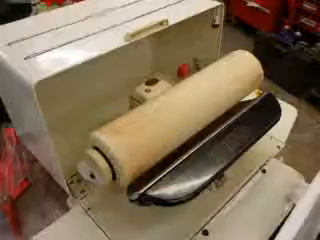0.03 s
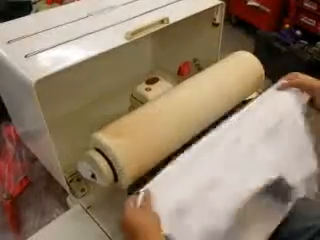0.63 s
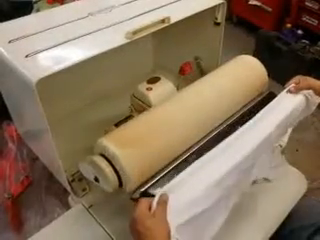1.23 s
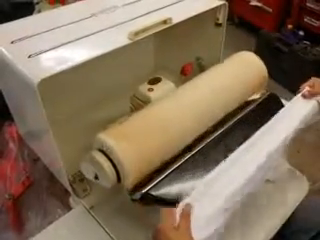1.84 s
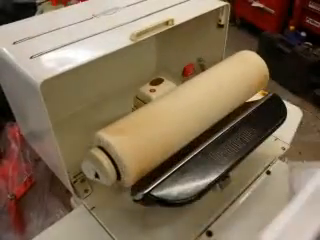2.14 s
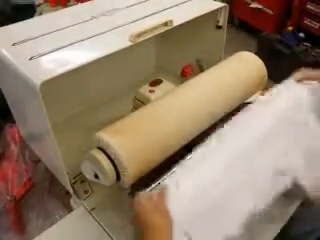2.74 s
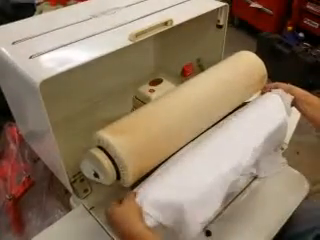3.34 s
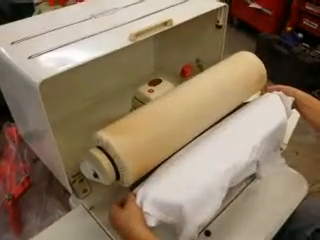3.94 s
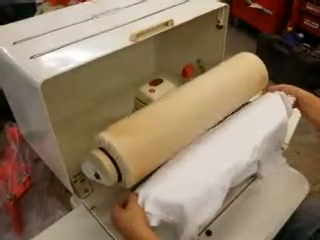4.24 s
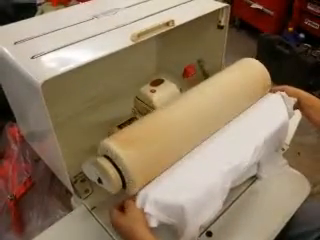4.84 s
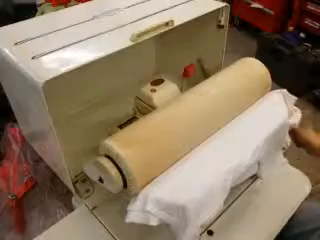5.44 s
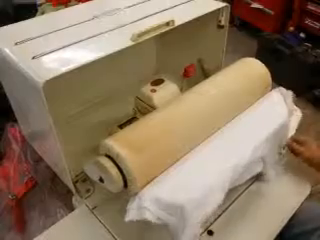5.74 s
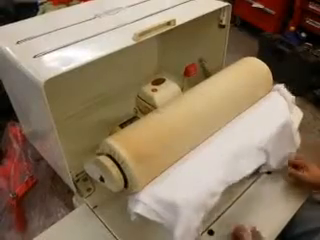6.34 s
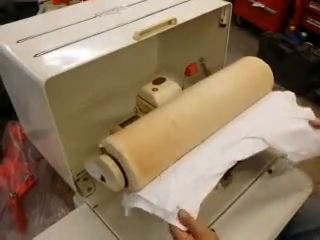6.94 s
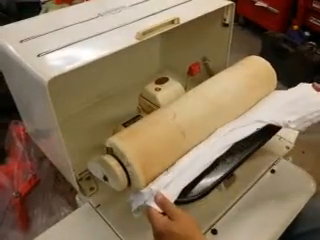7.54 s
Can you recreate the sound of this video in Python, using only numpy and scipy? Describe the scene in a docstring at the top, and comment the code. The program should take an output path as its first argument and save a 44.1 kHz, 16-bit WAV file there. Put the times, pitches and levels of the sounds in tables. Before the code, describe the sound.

In a workshop, a rotary ironer runs with a low hum, a wavering whine and rough gear noise, heard in stereo a little to the right. Its clutch clicks and steel levers clack in two main bursts, with dull cabinet thuds and faint cloth rustles between. Then the pressing plate comes down with a juddering slam and a brief hiss. The machine keeps humming, and each blow leaves a short ring.

```python
"""A workshop, with a vintage rotary ironer running nearer the right microphone of a stereo pair.
Its induction motor hums and whines, the gearbox churns and a bearing buzzes while a cloth is fed in.
Over that bed the clutch pawl clicks and the linkage clacks against the sheet-steel cabinet as the
heated shoe closes on the roller and lets go. Late on the shoe slams down and the roller hisses
against the cloth. Each blow leaves a short tail in cabinet and room."""
import sys
import numpy as np
from scipy import signal
from scipy.fft import rfft, irfft
from scipy.io import wavfile

SR = 44100
rng = np.random.default_rng(int(sys.argv[2]) if len(sys.argv) > 2 else 0)


def unload_audio(sound):
    """Save the sound as a 16-bit wav file, at the path given as the first command line argument."""
    columns = np.transpose(np.atleast_2d(sound))
    # keep every value between -1 and 1, then stretch to whole-number steps
    steps = np.round(np.clip(columns, -1, 1) * 32767)
    wavfile.write(sys.argv[1], SR, steps.astype(np.int16))


N = 335160
TIME = np.arange(N) / SR
BINS = np.maximum(np.arange(N // 2 + 1) * SR / N, 1)
MAINS_HZ, ROTOR_SLOTS, CUTOFF_HZ = 60, 33, 15900
START_S, FULL_S = .387, .62  # the sound of the already running machine fades in to full level
SLAM_S, ROLLING_S = 5.5435, 5.55  # the shoe slams down; the roller grabs the cloth

# likeness of the two microphones: (frequency [Hz], correlation [clipped to -1..1])
MIC_LIKENESS = [(30, 3), (100, 0.66), (300, 1.3), (700, 0.7), (1400, 0.24), (2500, -0.22), (16000, 0.17)]
# bright colour of steel cracks and cloth swishes: (frequency [Hz], density [dB])
BRIGHT_COLOUR = [(2500, -2), (4500, -12), (6000, 1.5), (6900, 2), (8500, -1.5), (10000, -7), (11300, -13.5),
                 (13500, -11), (16000, -30)]


def from_db(db):
    """Decibels to gain."""
    return 10 ** (np.asarray(db) / 20)


def in_time(points):
    """A (time, value) curve read at every sample."""
    return np.interp(TIME, *np.transpose(points))


def at_hz(points, hz):
    """A (frequency, value) curve read on a log-frequency axis."""
    f, value = np.transpose(points)
    return np.interp(np.log(hz), np.log(f), value)


def drift(rate_hz):
    """Slow random wander with spread 1."""
    pole = np.exp(-80 * np.pi * rate_hz / SR)
    noise = rng.standard_normal(N // 40 + 2002)  # one value per 40 samples
    slow = signal.lfilter([1], [1, -2 * pole, pole * pole], noise)[2000:]
    return np.interp(np.arange(N) / 40, np.arange(len(slow)), slow / slow.std())


def turns(hz):
    """Phase in radians of something that runs at a changing rate."""
    return 2 * np.pi * np.cumsum(hz) / SR


def add(out, s, sound):
    """Mix a sound in from a given time on."""
    i = round(s * SR)
    out[..., i:i + sound.shape[-1]] += sound[..., :N - i]


def filtered(x, kind, hz):
    """Second-order low-pass or high-pass."""
    return signal.sosfilt(signal.butter(2, hz, kind, fs=SR, output="sos"), x + 1e-18)


def mic_gains(hz):
    """Left and right gain at a frequency: the machine is nearer the right microphone."""
    # balance of the pair: (frequency [Hz], left minus right [dB])
    balance = [(120, -2), (300, -3.5), (1000, -3.5), (1500, -6), (1850, -5.5), (2250, -18), (2700, -5.5),
               (3300, -4.5), (4500, -5), (5800, -11), (6700, -6), (8000, -6), (9300, -15.5), (10800, -2),
               (12500, -3.5), (15000, -2)]
    gains = from_db(at_hz(balance, np.atleast_1d(hz)) * np.array([[.5], [-.5]]))
    return gains / gains.mean(axis=0)


def coloured(spectrum):
    """Stereo noise of a given colour with steep skirts; its middle has rms 1."""
    alike = np.clip(at_hz(MIC_LIKENESS, BINS), -1, 1)
    mid, side = rfft(rng.standard_normal((2, N)))
    skirts = np.minimum(1, np.minimum(BINS / spectrum[0][0], spectrum[-1][0] / BINS)) ** 4
    pair = np.sqrt(1 + alike) * mid + np.sqrt(1 - alike) * side * [[1], [-1]]
    noise = irfft(pair * mic_gains(BINS) * skirts * from_db(at_hz(spectrum, BINS)), N)
    return noise / noise.mean(axis=0).std()


def revolving(spectrum, shaft, repeat_share):
    """Rubbing parts: a share of the noise comes back alike on every turn of the shaft."""
    fresh = coloured(spectrum)
    period = round(2 * np.pi * N / shaft[-1])
    hz = np.maximum(np.arange(period // 2 + 1) * SR / period, 1)
    inside = (hz > spectrum[0][0]) & (hz < spectrum[-1][0])
    spread = np.arccos(np.clip(at_hz(MIC_LIKENESS, hz), -1, 1)) * rng.choice([-.5, .5], len(hz))
    phases = rng.uniform(0, 2 * np.pi, len(hz)) + spread * [[1], [-1]]
    turn = irfft(inside * from_db(at_hz(spectrum, hz)) * mic_gains(hz) * np.exp(1j * phases), period)
    turn /= turn.mean(axis=0).std()
    place = shaft / (2 * np.pi) % 1 * period
    repeating = np.array([np.interp(place, np.arange(period), channel) for channel in turn])
    return np.sqrt(repeat_share) * repeating + np.sqrt(1 - repeat_share) * fresh


def ringing(modes):
    """One second of decaying modes, each reaching the two microphones slightly apart."""
    t, out = TIME[:SR], np.zeros((2, SR))
    for hz, db, t60 in modes:
        tone = np.sin(2 * np.pi * hz * (t + rng.uniform(0, .0002, (2, 1)))) * rng.choice([-1, 1])
        out += mic_gains(hz) * from_db(db - 60 * t / t60) * tone
    return out


def mic_hiss(level_db=-62.5):
    """The microphones' own steady hiss."""
    # noise floor: (frequency [Hz], density [dB])
    colour = [(2000, 1.5), (9000, 2.5), (10500, -4), (12500, -1.5), (15000, -1), (15800, -14)]
    return from_db(level_db) * coloured(colour)


def hum():
    """The motor's iron is pulled twice in every mains cycle."""
    # magnetic hum, dipping briefly at the slam: (time [s], level [dB])
    level = [(.42, -46.5), (.63, -37.5), (4.1, -34.5), (4.35, -36), (5.53, -40.5), (5.59, -51),
             (5.66, -38.5), (6.16, -41), (6.9, -37), (7.6, -36)]
    # its harmonics: (frequency [multiples of the mains], relative level [dB])
    harmonics = [(2, 3), (4, -22.5), (6, -47)]
    field = 2 * np.pi * MAINS_HZ * TIME
    tone = sum(from_db(db) * mic_gains(k * MAINS_HZ) * np.cos(k * field) for k, db in harmonics)
    return from_db(in_time(level)) * tone


def rotor(shaft, shaft_hz, waver_db=2.5, windage_db=-51.5, throb=0.5):
    """Rotor slots whine, with sidebands and a throbbing rush from the pulsing field."""
    # loudness of the whine: (time [s], level [dB])
    level = [(.6, -44), (1.4, -42.5), (1.8, -51), (2.2, -46.5), (3.6, -47), (4.5, -44.5), (5.8, -43),
             (6.25, -44.5), (6.8, -42.5)]
    # its partials: (order [shaft multiples], sideband [mains multiples], relative level [dB])
    partials = [(33, -2, -3.5), (33, 0, -4.5), (33, 2, -8), (34, 0, -10), (34, 2, -13), (26, 0, -14),
                (18, 0, -13), (11, 0, -7.5), (8, 0, -10.5), (44, 0, -15), (50, 0, -32)]
    # high overtones, heard until the roller is driven: same columns, orders rounded for the pitch
    idle_partials = [(65.54, 2, -10), (100.4, 0, -18.5), (132.5, 0, -25.5), (168, 0, -30)]
    # air rushing round the rotor: (frequency [Hz], density [dB])
    air_colour = [(500, -6), (740, -5), (860, 0.5), (1000, 2), (1130, -2), (1220, -7), (1400, -9),
                  (1800, -24), (3000, -38)]
    field, whine_db = 2 * np.pi * MAINS_HZ * TIME, in_time(level)
    idling = np.clip((ROLLING_S - TIME) * 10, 0, 1)
    whine = np.zeros((2, N))
    for rows, share in (partials, 1), (idle_partials, idling):
        for order, sideband, db in rows:
            phase = round(order) * shaft + sideband * field + rng.uniform(0, 2 * np.pi)
            apart = rng.normal(0, 0.37) * np.array([[1], [-1]])  # reflections shift each side's phase
            gain = share * from_db(db + waver_db * drift(1.83))
            whine += gain * mic_gains(order * shaft_hz) * np.cos(phase + apart)
    air_gain = from_db(windage_db + 0.46 * (whine_db - whine_db.mean()))
    windage = air_gain * coloured(air_colour) * (1 + throb * np.cos(2 * field))
    return from_db(whine_db) * whine + windage


def gearbox(shaft, idle_db=-47.5, lumpy_db=1.9):
    """Gears churn evenly when idle and roughly under load."""
    # low churning: (frequency [Hz], density [dB])
    colour = [(35, -23.5), (75, -7.5), (105, -5), (150, 6), (172, 6), (200, -4), (250, -2), (330, -1),
              (440, -1.5), (510, -9), (600, -15), (750, -14), (1200, -18.5), (2000, -15)]
    # load, heard as the strength of the churning: (time [s], level [dB])
    load = [(0.62, -43), (0.73, -47), (1.31, -41), (1.43, -40.5), (2.09, -39.5), (2.41, -52), (2.84, -45),
            (3.23, -50.5), (4.19, -40.5), (4.35, -45.5), (4.75, -42), (5.41, -46.5), (5.62, -37.5),
            (5.79, -42), (6.08, -52.5), (7.16, -47.5), (7.55, -53)]
    load_db = in_time(load) + 1
    evenness = 0.59 * from_db(-np.maximum(load_db - idle_db, 0))
    return from_db(load_db + lumpy_db * drift(8.9)) * revolving(colour, shaft, evenness)


def bearing(shaft):
    """The bearing's buzz pulses once a turn and twice a mains cycle."""
    # rubbing in the bearing: (frequency [Hz], density [dB])
    colour = [(1200, -10), (1500, -8.5), (1880, -4), (2020, 2.5), (2180, 6), (2380, -2.5), (2550, -32),
              (2800, -11), (3300, -26), (4500, -47)]
    # its buzz: (time [s], level [dB])
    level = [(0.62, -55.5), (1.53, -51.5), (2.69, -52), (3.07, -50), (3.36, -55), (3.71, -54.5),
             (4.02, -48.5), (4.27, -60), (4.54, -54.5), (5.58, -45), (5.73, -50), (7.55, -49.5)]
    beat = 1 + 0.093 * np.cos(shaft) + 0.17 * np.cos(4 * np.pi * MAINS_HZ * TIME)
    return from_db(in_time(level)) * beat * revolving(colour, shaft, repeat_share=0.24)


def roller(still_db=-59.0, rolling_db=-50.5, grab_db=16.0, grab_s=0.079):
    """A faint hiss flares as the roller grabs the cloth, then settles louder than before."""
    # roller hiss: (frequency [Hz], density [dB])
    colour = [(2500, 3), (3000, -4), (3400, -4), (4600, -6), (5900, 0), (7000, -1.5), (9000, -12.5),
              (10400, -19.5), (15000, -32)]
    flare_db = grab_db * np.exp(-abs(TIME - ROLLING_S) / grab_s)
    level_db = np.where(TIME < ROLLING_S, still_db, rolling_db + flare_db)
    return from_db(level_db + 0.93 * drift(4.1)) * coloured(colour)


def groans(waver_db=5.0):
    """Under load, gears groan in short glides and the motor adds a wavering whine."""
    # gear and motor tones: (start [s], end [s], first pitch [Hz], last pitch [Hz], level [dB])
    tones = [(1.6, 2.2, 680, 650, -54), (1.7, 2.12, 440, 455, -49), (1.55, 2.45, 168, 162, -45),
             (1.4, 2.3, 921, 921, -52), (4.68, 5.2, 505, 530, -53)]
    out = np.zeros((2, N))
    for start, end, first_hz, last_hz, db in tones:
        along = np.clip((TIME - start) / (end - start), 0, 1)
        hz = (first_hz + (last_hz - first_hz) * along) * (1 + 0.011 * drift(27.5))
        envelope = from_db(db + waver_db * drift(13.0)) * np.sqrt(abs(np.sin(np.pi * along)))
        out += mic_gains(first_hz) * envelope * np.sin(turns(hz))
    return out


def cloth(grain_db=2.8):
    """Cloth slides over the table in soft, grainy swishes."""
    # swishes: (time [s], half length [s], level [dB])
    rustles = [(0.877, 0.02, -53), (0.942, 0.038, -51.5), (3.233, 0.047, -53), (3.548, 0.033, -55.5),
               (4.585, 0.075, -51.5), (5.447, .04, -47.5)]
    swell = sum(from_db(db) * np.exp(-((TIME - s) / half) ** 2) for s, half, db in rustles)
    return swell * from_db(grain_db * drift(60)) * coloured(BRIGHT_COLOUR)


def pop(s=2.6053, gain_db=-8.0, fall_s=0.0026, right_db=-24.0):
    """One dry pop at the left microphone: a pressure step that swings back slowly."""
    out, t = np.zeros((2, N)), TIME[:SR // 10]
    pulse = filtered(np.exp(-t / fall_s) - np.exp(-t / .00008), "high", 65)
    add(out, s, from_db([[gain_db], [gain_db + right_db]]) * pulse)
    return out


def handling():
    """The shoe rings when knocked, by hand or against the roller; a small metal part is tapped."""
    # knocks on the shoe and taps on the small part: (time [s], level [dB])
    knocks = [(1.253, -31), (2.984, -22.5), (5.556, -24.5)]
    taps = [(6.509, -42.5), (6.524, -40.5)]
    # the modes of each: (frequency [Hz], relative level [dB], t60 [s])
    shoe_modes = [(325, -1, .17), (372, -6, .08), (440, -11, .07), (1000, -9, .08), (2100, -2, .1),
                  (2260, -14, .05)]
    part_modes = [(72, -9, 0.17), (191, 3.5, 0.11), (1753, -4, 0.062), (2500, -5, .08), (2950, -8, 0.074),
                  (3070, 0, 0.056), (3311, -2, 0.12), (3770, -8, 0.088), (4000, -12, .08)]
    out = np.zeros((2, N))
    for hits, modes in (knocks, shoe_modes), (taps, part_modes):
        for s, db in hits:
            add(out, s, from_db(db) * ringing(modes))
    return out


def struck(spectrum, modes, hits, early_s, tail_db, t60, rattle, chatter_s=.007):
    """A burst of crowded modes, a tail in cabinet and room, a few clear modes; each blow chatters."""
    t, n = TIME[:SR], SR // 10
    decay = np.exp(-t / early_s) + from_db(tail_db - 60 * t / t60)
    response = coloured(spectrum)[:, :SR] * decay + ringing(modes)
    out = np.zeros((2, N))
    for s, db, top_hz in hits:
        contacts = rng.standard_normal(n) * (rng.random(n) < 1500 / SR) * np.exp(-t[:n] / chatter_s)
        contacts *= rattle / (np.linalg.norm(contacts) + 1e-9)
        contacts[0] += 1  # the main impact
        blow = signal.fftconvolve(response, filtered(contacts, "low", top_hz)[None], axes=1)
        attack_rms = blow[:, :SR // 40].mean(axis=0).std()
        add(out, s, from_db(db) * blow / attack_rms)
    return out


def blows(rows, offset_db, top_hz=CUTOFF_HZ):
    """Blows as they reach one part: (time [s], level [dB], top of the excited band [Hz])."""
    s, db = np.transpose(rows)[:2]
    return list(zip(*np.broadcast_arrays(s, db + offset_db, np.clip(top_hz, 300, CUTOFF_HZ))))


def slam(peak_db, rise_s, fall_db_per_s, count=11, judder_s=.0075):
    """The shoe judders on the roller: uneven contacts build up as it seats, then die away."""
    t = judder_s * (np.arange(count) + rng.uniform(0, .3, count))
    db = peak_db - 14 * np.maximum(1 - t / rise_s, 0) - fall_db_per_s * np.maximum(t - rise_s, 0)
    return [(SLAM_S + after, level, CUTOFF_HZ) for after, level in zip(t, db)]


def linkage():
    """Thuds go mostly to the cabinet, clacks to the lever, clicks to the pawl; hard blows crack."""
    # dull thuds from handling and the shoe's shifting weight: (time [s], level [dB])
    thuds = [(.61, -39), (1.252, -37), (1.36, -30.5), (1.385, -30), (1.562, -34), (2.14, -43),
             (2.255, -46.5), (3.79, -39), (4.003, -30.5), (4.026, -27.5), (4.563, -32), (5.414, -31),
             (5.464, -35), (5.997, -40)]
    # steel links clack together: (time [s], level [dB], hardness as crack over clank [dB])
    clacks = [(1.294, -42, -5), (1.36, -37, 1), (1.466, -29.5, -1.5), (1.498, -27.5, -3.5),
              (1.562, -38, -25), (1.916, -46.5, -6), (1.975, -49, 4.5), (2.255, -45, -19), (2.3, -54, 1.5),
              (2.42, -44, -25), (2.981, -34.5, -15), (3.844, -54, -28), (3.955, -48.5, 2), (4.003, -32, -2),
              (4.062, -29, -6.5), (4.139, -30.5, -1), (4.644, -47.5, 0.5), (4.732, -40.5, -16),
              (4.931, -36.5, -16.5), (5.151, -35, -15.5), (5.384, -34.5, -12), (5.464, -49.5, 4.5)]
    # the pawl drops into its notch: (time [s], level [dB])
    clicks = [(0.419, -39.5), (1.058, -28), (2.111, -25)]
    # crowded modes of each part: (frequency [Hz], density [dB])
    cabinet_colour = [(110, -17), (150, -11), (195, -7), (235, 1.5), (330, -.5), (450, -2), (560, -9),
                      (670, -3.5), (950, -10), (1120, -8), (1260, -19), (2000, -34)]
    lever_colour = [(700, -28), (1000, -1.5), (1250, -7.5), (1500, -7.5), (1950, -1.5), (2250, 4.5),
                    (2600, -10.5), (3100, -10.5), (4200, -6), (5500, -10), (8000, -45)]
    pawl_colour = [(4500, -14), (5300, -5), (5700, 3), (6000, -0.5), (6350, 3), (6800, -10), (7500, -26)]
    # clear, pitched modes of each part: (frequency [Hz], relative level [dB], t60 [s])
    cabinet_modes = [(226.3, 0.5, 0.29), (269.4, -11, 0.79), (332.5, -14.5, 1), (446.3, -10, 0.56),
                     (657, -36, 0.22), (1100, -17, 0.19)]
    lever_modes = [(1415, -43, 0.12), (2060, -33, 0.28), (2200, -21.5, 0.11), (2510, -6, 0.11)]
    pawl_modes = [(5276, -22, .26), (5700, -16, 0.38), (5930, -15, 0.27), (6035, -22, 0.4),
                  (6400, -25, 0.2), (6950, -15, 0.18)]
    crack_modes = [(6300, -20, 0.21), (7130, -5, 0.2), (7208, -31, 0.27), (8000, -30, 0.24),
                   (8300, -23, .28), (13600, -19, 0.16)]
    hardness_db = np.transpose(clacks)[2]

    hits = blows(thuds, -3) + blows(clacks, -13) + slam(-25.5, rise_s=.014, fall_db_per_s=80)
    boom = struck(cabinet_colour, cabinet_modes, hits, early_s=.023, tail_db=-12, t60=.87, rattle=.22)

    hits = blows(clacks, -1, top_hz=7000 * from_db(.38 * hardness_db)) + blows(thuds, -12, top_hz=2260)
    hits += blows(clicks, -12.5) + slam(-31, rise_s=.0053, fall_db_per_s=55)
    clank = struck(lever_colour, lever_modes, hits, early_s=.008, tail_db=-2, t60=.4, rattle=.39)

    hits = blows(clicks, -3) + blows(clacks, hardness_db - 3.5)
    hits += slam(-38, rise_s=.008, fall_db_per_s=20)
    ping = struck(pawl_colour, pawl_modes, hits, early_s=.01, tail_db=-6, t60=.42, rattle=.8)

    hits = blows(clacks, hardness_db) + blows(clicks, -7) + blows(thuds, -21)
    hits += slam(-22.5, rise_s=.0072, fall_db_per_s=280)
    crack = struck(BRIGHT_COLOUR, crack_modes, hits, early_s=.0047, tail_db=-5.5, t60=.32, rattle=1)
    return filtered(boom, "high", 100) + clank + ping + crack


def scene(slot_hz=980.3, wander_hz=.7, sag_hz=3):
    """The sound of the already running machine fades in; blows and handling lie over it."""
    # the rotor's slot tone runs a little flat once the roller is driven
    shaft_hz = (slot_hz + wander_hz * drift(1.47) - sag_hz * (TIME > ROLLING_S)) / ROTOR_SLOTS
    shaft = turns(shaft_hz)
    fade_in = from_db(np.interp(TIME, [START_S, FULL_S], [-13.5, 0]))
    moving_parts = rotor(shaft, shaft_hz.mean()) + gearbox(shaft) + bearing(shaft) + roller()
    machine = hum() + fade_in * moving_parts
    return machine + groans() + linkage() + handling() + cloth() + pop() + mic_hiss()


def record(dry, fade_s=0.042, low_cut_hz=42):
    """The microphones fade in after a silent start; deep bass and the top are cut."""
    opening = np.clip((TIME - START_S) / fade_s, 0, 1)
    thinned = filtered(dry * opening, "high", low_cut_hz)
    return signal.sosfilt(signal.ellip(10, .1, 80, CUTOFF_HZ, fs=SR, output="sos"), thinned)


dry = scene()
out = record(dry)
unload_audio(out)
```